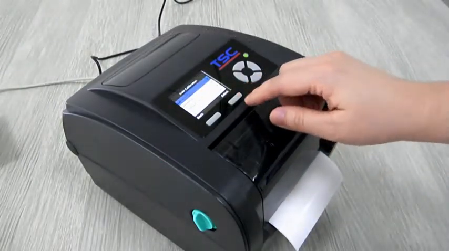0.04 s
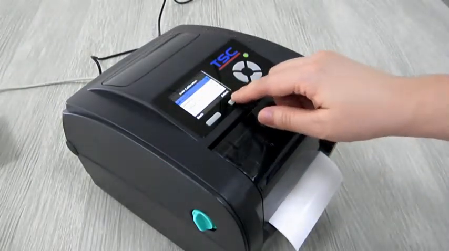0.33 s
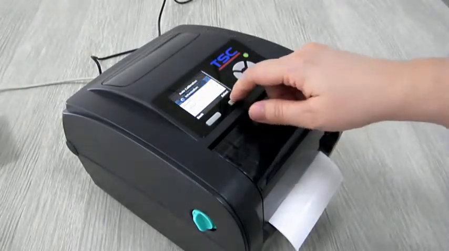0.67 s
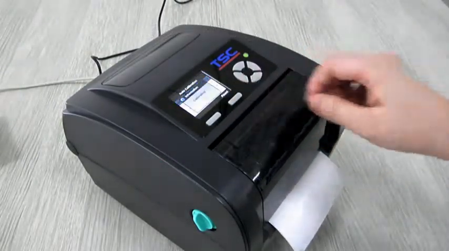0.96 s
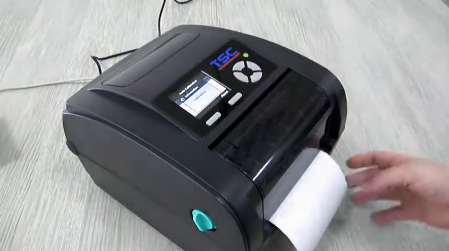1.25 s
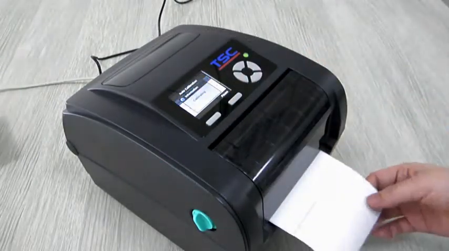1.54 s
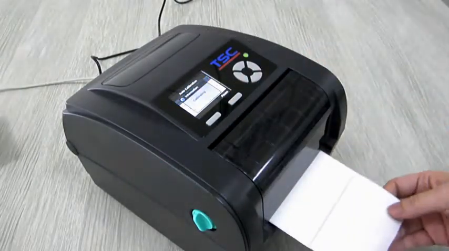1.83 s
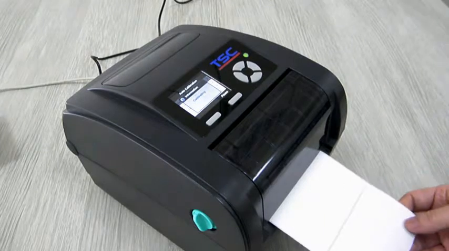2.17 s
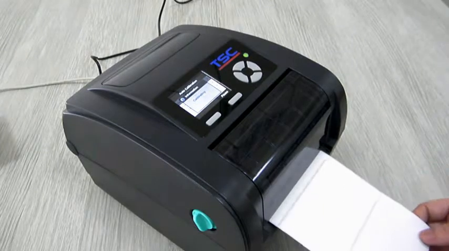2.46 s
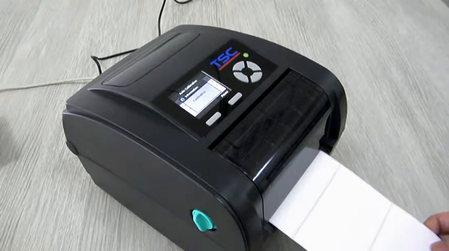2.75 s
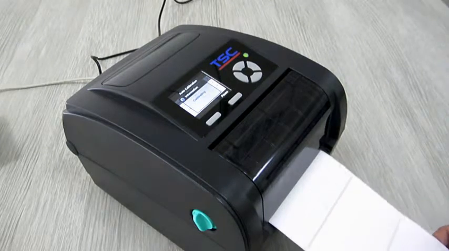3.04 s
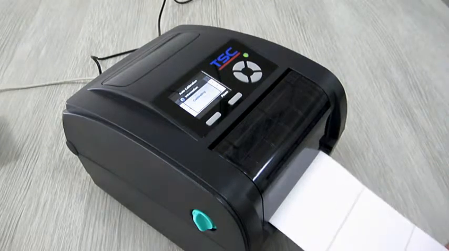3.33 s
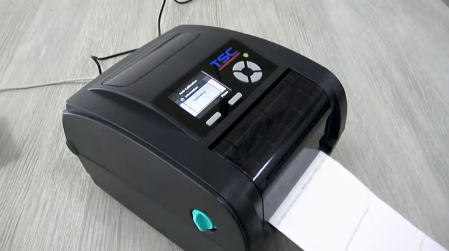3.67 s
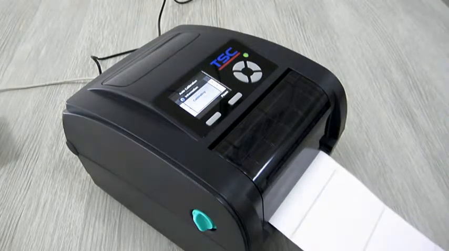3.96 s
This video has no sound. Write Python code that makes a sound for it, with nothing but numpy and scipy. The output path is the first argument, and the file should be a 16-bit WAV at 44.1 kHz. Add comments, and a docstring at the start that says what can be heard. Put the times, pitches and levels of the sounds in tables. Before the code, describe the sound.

A small label printer runs close by in a small room. After faint room noise, a button clicks down at about 0.6 seconds and up near 0.8. The drive starts at once with a clack, then hums at an even pitch over whirring gears and soft paper hiss until the end at 4 seconds. Label edges knock the plastic case around 1, 2.2 and 3.4 seconds.

```python
"""A desktop label printer

A button clicks down and up, the drive starts with a clack, and a stepper motor hums at its step rate
over whirring gears. Friction makes the strip hiss as it leaves the slot, and each label edge knocks
the plastic case into free vibration as it passes the roller. It is heard close by, in a small room."""
import sys
import numpy as np
from scipy import signal
from scipy.fft import rfft, irfft
from scipy.io import wavfile

SR = 44100
rng = np.random.default_rng(int(sys.argv[2]) if len(sys.argv) > 2 else 0)


def store_pcm(level_fs):
    """Save levels as 16-bit WAV."""
    pcm = np.round(np.clip(level_fs, -1, 1) * 32767).astype(np.int16)
    wavfile.write(sys.argv[1], SR, np.atleast_2d(pcm).T)


N = 176400
TIME = np.arange(N) / SR

# Stereo width. Each row: frequency in Hz, side relative to mid in dB.
STEREO_WIDTH = [(40, -21), (130, -25), (350, -34), (1000, -23), (3000, -16.5), (9000, -14.5)]
# Spectrum of the room noise. Each row: frequency in Hz, relative density in dB.
NOISE_SPECTRUM = [(20, -16.5), (40, -22), (55, -21.5), (100, -18.5), (160, -6.5), (250, -7), (320, -14.5),
                  (450, -17.5), (740, -20.5), (1300, -25), (2300, -26), (4000, -35.5), (7000, -41),
                  (8800, -45.5), (9800, -36), (10400, -35)]
# Decay of the room. Each row: frequency in Hz, reverberation time (t60) in seconds.
ROOM_DECAY = [(200, 0.89), (1000, 0.56), (3000, 0.29), (10000, 0.44)]

# One roller judder per label. Each row: centre in seconds, length in seconds, pitch in Hz, level in dB.
ROLLER_JUDDERS = [(0.893, 0.1, 122, -36.5), (1.98, 0.16, 141, -32.5), (3.177, 0.23, 141, -37)]
# Friction of the moving strip. Each row: time in seconds, scrape level in dB, hiss level in dB.
STRIP_LEVELS = [(.82, -24, -30), (.92, -29.5, -29), (1.0, -31, -29.5), (1.09, -26.5, -30.5),
                (1.2, -32, -31.5), (1.32, -29.5, -31), (1.48, -32, -29), (1.65, -34, -36.5),
                (1.87, -42.5, -39.5), (1.92, -33, -33.5), (1.98, -40, -38), (2.17, -37.5, -36),
                (2.25, -33.5, -37.5), (2.38, -41, -37.5), (2.75, -40, -39.5), (2.95, -37, -35),
                (3.12, -34.5, -35), (3.36, -37.5, -32.5), (3.6, -38.5, -38), (4.0, -41.5, -37.5)]
# Spectra of paper on the slot's lip and of the gears. Each row: frequency in Hz, relative density in dB.
SCRAPE_SPECTRUM = [(200, -19.5), (900, -9), (1400, 2.5), (2050, -9.5), (2400, 2.5), (2800, 1.5), (3300, 0),
                   (3900, -7), (6000, -30), (10400, -37)]
GEAR_SPECTRUM = [(40, -41), (100, -34), (140, -8.5), (200, -19), (245, -4.5), (300, 2.5), (370, -2),
                 (480, -8.5), (560, -5.5), (800, -5.5), (1100, -7.5), (1450, -8.5), (1650, -13), (1850, -8),
                 (2050, -11), (2300, -17), (3000, -21.5), (6000, -25), (10500, -68)]
# Bright paper hiss, with a deep notch filtered out near 8 kHz that is not the paper's own.
# Each row: frequency in Hz, relative density in dB.
NOTCHED_HISS = [(300, -14.5), (1500, -0.5), (3800, -4), (4700, 4), (5500, -1.5), (6300, -0.5), (7200, -4.5),
                (7900, -51.5), (8700, -3.5), (10400, -1.5)]

# Button down, button up, drive engaging. Each row: start in seconds, thud gain in dB,
# case gain in dB, snap gain in dB, snap time constant in seconds, rattle gain in dB.
CLICK_IMPACTS = [(.5668, -36, -29, -15.5, 0.0014, -38), (.7695, -25, -17.5, -12, 0.00066, -42),
                 (.8208, -6, -4.5, -6, 0.0012, -14)]
# Label edges meeting and leaving the roller. Each row: as for the clicks.
EDGE_IMPACTS = [(.9738, -16, -6.5, -15, 0.0024, -25.5), (.9790, -3, -27, -22, .001, -40),
                (.9950, -44, -37, -17.5, 0.0016, -32), (1.0163, -10, 0, -16, 0.0017, -21),
                (2.1650, -5.5, -37.5, -29, 0.0022, -41), (2.2045, -2, -22, -17, 0.0045, -20),
                (2.2105, -6, -29, -25, 0.0044, -20.5), (2.2240, -22, -21, -28, 0.0027, -21.5),
                (3.3530, -10, -41, -28, 0.0016, -23), (3.3930, -12, -13, -21, .005, -21),
                (3.3962, -2, -16.5, -18, 0.0046, -25)]
# Low modes (the thud) and high modes of the plastic case.
# Each row: frequency in Hz, relative level in dB, t60 in seconds.
THUD_MODES = [(210, -23, 0.083), (315, -5.5, 0.025), (326, -12.5, 0.077), (368, -2.5, 0.06),
              (454, -6.5, 0.026), (830, -16, 0.015), (1090, -9, 0.012)]
CASE_MODES = [(1120, -11, 0.012), (1450, -4.5, .014), (2650, -3.5, 0.021), (2810, -2.5, 0.018),
              (3100, -2, 0.009), (3530, -9.5, 0.018)]
# Sharp button and label-edge snaps, with a notch filtered out near 8 kHz that is not their own.
# Each row: frequency in Hz, relative density in dB.
NOTCHED_CLICK_SNAP = [(200, -18), (800, 3), (1400, 3), (2100, -4), (2900, 4), (4000, -2), (5000, 0.5),
                      (6500, -3.5), (7800, -19), (9000, -1.5), (10400, 0)]
NOTCHED_EDGE_SNAP = [(60, -29), (200, -16), (800, 5), (1400, 7.5), (2100, 1), (2900, 1), (4000, 3.5),
                     (6300, 3.5), (7800, -22), (8800, -9), (10400, -6.5)]
# Spectrum of loose parts rattling. Each row: frequency in Hz, relative density in dB.
RATTLE_SPECTRUM = [(60, -48.5), (140, -8), (220, -15.5), (350, 11), (550, 0), (1000, 1), (1500, -7),
                   (2100, -12), (3000, -26.5), (6000, -15), (10400, -55)]

# Motor speed. Each row: time in seconds, step rate in Hz.
STEP_RATE = [(.82, 446.8), (1.0, 447.3), (1.35, 448.4), (1.85, 447.8), (2.2, 446.6), (2.7, 446.5),
             (3.1, 447.1), (3.4, 445.6), (4.0, 446.2)]
# The step tone, its octave and the whine two octaves up. Each row: time in seconds, level in dB.
HUM_LEVEL = [(.82, -42), (.88, -20), (.96, -14), (1.01, -21), (1.13, -16.5), (1.25, -16.5), (1.38, -12.5),
             (1.6, -17), (1.77, -16.5), (2.1, -14), (2.3, -16.5), (2.57, -12.5), (2.88, -12.5),
             (2.98, -15.5), (3.32, -12.5), (3.41, -17), (3.55, -14), (4.0, -14)]
OCTAVE_LEVEL = [(.82, -37), (.96, -23.5), (1.03, -29.5), (1.15, -25.5), (1.32, -22.5), (1.63, -29),
                (1.85, -22), (1.93, -26), (2.06, -20.5), (2.2, -25), (2.29, -34.5), (2.47, -28),
                (2.61, -22), (2.88, -24), (2.98, -26.5), (3.3, -27), (3.52, -23.5), (4.0, -27)]
WHINE_LEVEL = [(.82, -39), (.94, -34.5), (1.1, -45), (1.93, -40.5), (2.03, -29.5), (2.2, -39), (2.3, -41),
               (2.44, -34.5), (2.86, -36.5), (2.96, -30), (3.1, -30.5), (3.35, -33), (3.44, -41),
               (3.55, -33.5), (4.0, -35)]
# Weaker motor and gear tones. Each row: frequency in Hz at the nominal step rate, level in dB.
DRIVE_TONES = [(397, -40.5), (489, -38.5), (588.5, -37.5), (669.5, -52.5), (751.5, -37.5), (992, -47.5),
               (1341, -46.5), (2132, -46), (2239, -45), (2750, -61)]


def amp(db):
    """Amplitude grows tenfold with every 20 dB."""
    return 10 ** (np.asarray(db) / 20)


def unit(x):
    """Normalisation to an rms of 1."""
    return x / np.sqrt(np.mean(x ** 2) + 1e-20)


def curve(points):
    """Linear interpolation of a time table at every sample."""
    return np.interp(TIME, *np.transpose(points))


def at_frequency(points, hz):
    """Interpolation of a table on a logarithmic frequency axis."""
    table_hz, value = np.transpose(points)
    return np.interp(np.log(hz + 1), np.log(table_hz + 1), value)


def add(mix, start_s, sound):
    """Superposition: a sound adds to the mix from its start time."""
    part = mix[round(start_s * SR):][:len(sound)]
    part += sound[:len(part)]


def drift(rate_hz):
    """Low-passed noise gives a slow random motion of rms 1."""
    hz = np.fft.rfftfreq(N, 1 / SR)
    return unit(irfft(rfft(rng.standard_normal(N)) / (1 + (hz / rate_hz) ** 4), N))


def colour(x, spectrum, size=4096):
    """A causal filter of unit energy imposes the shape of a spectrum."""
    hz = abs(np.fft.fftfreq(size, 1 / SR))
    log_gain = np.log(amp(at_frequency(spectrum, hz)))
    taps = np.fft.ifft(np.exp(signal.hilbert(log_gain).conj())).real[:size // 2]
    return signal.oaconvolve(x, taps / np.linalg.norm(taps))[:len(x)]


def spread(mid, other):
    """Mid-side stereo: a weak uncorrelated side signal gives a nearly mono pair."""
    width = amp(at_frequency(STEREO_WIDTH, np.fft.rfftfreq(N, 1 / SR)))
    side = irfft(rfft(other) * width, N)
    return np.array([mid + side, mid - side])


def stereo_noise(excite, spectrum):
    """Source and filter: two independent draws of an excitation, coloured alike, form mid and side."""
    return spread(*[unit(colour(excite(), spectrum)) for _ in range(2)])


def grains(per_s, spread_db, smooth):
    """Shot noise: tiny random impacts of uneven size, blended with smooth noise."""
    sizes = amp(spread_db * np.minimum(rng.exponential(1, N), 4)) * rng.choice([-1, 1], N)
    impacts = sizes * (rng.random(N) < per_s / SR)
    return unit(unit(impacts) + smooth * rng.standard_normal(N))


def ambience(level_db=-37.5):
    """Stationary noise, strongest at low frequencies, is the background of the room."""
    return amp(level_db) * stereo_noise(lambda: rng.standard_normal(N), NOISE_SPECTRUM)


def reverberation(x, size=256, density=.08, gap_samples=150):
    """Sparse reflections form a diffuse tail, each band decaying exponentially at its own rate."""
    echoes = []
    for _ in range(2):
        reflections = rng.choice([-1., 1.], SR) * (rng.random(SR) < density)
        reflections *= np.arange(SR) > gap_samples
        hz, t, bands = signal.stft(reflections, SR, nperseg=size)
        decay = amp(-60 * t / at_frequency(ROOM_DECAY, hz)[:, None])
        tail = signal.istft(bands * decay, SR, nperseg=size)[1]
        echoes.append(signal.fftconvolve(x, tail / np.linalg.norm(tail))[:N])
    return spread(*echoes)


def roller(wobble_cycles=0.025):
    """The roller judders ahead of each label edge: a low vibration under a Gaussian envelope."""
    sway = wobble_cycles * drift(15)
    out = 0
    for centre_s, length_s, hz, db in ROLLER_JUDDERS:
        envelope = amp(db) * np.exp(-(2 * (TIME - centre_s) / length_s) ** 2)
        out += envelope * np.sin(2 * np.pi * (hz * TIME + sway))
    return np.sqrt(2) * out


def paper(flicker_db=0.45):
    """Sliding friction: the strip scrapes the lip of the slot and hisses; a filter notches the hiss."""
    times, scrape_db, hiss_db = np.transpose(STRIP_LEVELS)
    out = 0
    for level_db, spectrum in ((scrape_db, SCRAPE_SPECTRUM), (hiss_db, NOTCHED_HISS)):
        friction = stereo_noise(lambda: grains(per_s=3000, spread_db=2.0, smooth=0.73), spectrum)
        out += amp(np.interp(TIME, times, level_db)) * friction
    return out * amp(flicker_db * drift(50))


def gears(steps, level_db=-26.5, pulsing=0.42, swell_db=1.0):
    """Amplitude modulation: teeth chatter into the housing, pushed by every motor step."""
    push = (1 + pulsing * np.cos(2 * np.pi * steps)) * amp(swell_db * drift(19))
    whir = stereo_noise(lambda: push * grains(per_s=1800, spread_db=1.9, smooth=0.69), GEAR_SPECTRUM)
    return amp(level_db) * whir


def ring(modes, t, detune=0.0098):
    """Free vibration is a sum of damped modes, here slightly detuned for every impact."""
    out = 0
    for hz, db, t60 in modes:
        detuned_hz = hz * (1 + detune * rng.uniform(-1, 1))
        out += amp(db - 60 * t / t60) * np.sin(2 * np.pi * detuned_hz * t)
    return out / 2


def crackle(t, decay_s, rise_s=0.00036, tail_db=-12.5, tail_s=0.0023):
    """A brief contact is broadband: the noise of a snap, dying as the sum of two exponentials."""
    decay = np.exp(-t / decay_s) + amp(tail_db) * np.exp(-t / tail_s)
    return rng.standard_normal(len(t)) * np.minimum(t / rise_s, 1) * decay


def rattle(t, rise_s=0.0042, decay_s=.055):
    """Loose parts, once shaken, collide at random with decaying strength."""
    collisions = grains(per_s=700, spread_db=0.87, smooth=0.26)[:len(t)]
    return unit(colour(collisions, RATTLE_SPECTRUM)) * np.minimum(t / rise_s, 1) * np.exp(-t / decay_s)


def impacts(table, snap_filter, room_db, tick_db=15.5, cutoff_hz=223):
    """Impulsive excitation: each blow snaps, rings the case and shakes loose parts; the room echoes."""
    direct, to_room = np.zeros(N), np.zeros(N)
    t = np.arange(SR // 3) / SR
    tick = amp(tick_db) * (t == 0)
    small_box = signal.butter(4, cutoff_hz, "high", fs=SR, output="sos")  # radiates little bass
    for start_s, thud_db, case_db, snap_db, snap_s, rattle_db in table:
        snap = amp(snap_db) * colour(tick + crackle(t, snap_s), snap_filter)
        modes = amp(thud_db) * ring(THUD_MODES, t) + amp(case_db) * ring(CASE_MODES, t)
        body = signal.sosfilt(small_box, modes)
        add(direct, start_s, body + snap + amp(rattle_db) * rattle(t))
        add(to_room, start_s, body + amp(snap_db) * colour(2 * tick, snap_filter))
    return direct + amp(room_db) * reverberation(to_room)


def stepper(steps, nominal_hz=447, flutter_db=0.92, jitter_cycles=0.011,
            gear_waver_db=3.0, gear_jitter_cycles=0.027):
    """Forced vibration: the step tone, its overtones and the gear tones all follow the motor speed."""
    uneven_steps = steps + jitter_cycles * drift(39)
    out = 0
    for harmonic, levels in ((1, HUM_LEVEL), (2, OCTAVE_LEVEL), (4, WHINE_LEVEL)):
        gain = amp(curve(levels) + flutter_db * np.sqrt(harmonic) * drift(20))
        out += gain * np.cos(2 * np.pi * harmonic * uneven_steps)
    for hz, db in DRIVE_TONES:
        gain = amp(db + gear_waver_db * drift(4.6))
        cycles = steps * hz / nominal_hz + gear_jitter_cycles * drift(15.4) + rng.random()
        out += gain * np.sin(2 * np.pi * cycles)
    return np.sqrt(2) * out


def scene(drive_start_s=.821, drive_rise_s=0.0025):
    """Sound pressures add: the running drive, the clicks, the knocks and the room noise."""
    steps = np.cumsum(curve(STEP_RATE)) / SR
    running = np.clip((TIME - drive_start_s) / drive_rise_s, 0, 1)
    drive = running * (stepper(steps) + gears(steps) + paper() + roller())
    clicks = impacts(CLICK_IMPACTS, NOTCHED_CLICK_SNAP, room_db=-7.5)
    knocks = impacts(EDGE_IMPACTS, NOTCHED_EDGE_SNAP, room_db=-7)
    return drive + clicks + knocks + ambience()


def record(dry, ceiling=.85, knee=12, cutoff_hz=10490):
    """Soft saturation rounds the loudest peaks, and a low-pass filter limits the bandwidth."""
    rounded = dry / (1 + abs(dry / ceiling) ** knee) ** (1 / knee)
    low_pass = signal.firwin(511, cutoff_hz, window=("kaiser", 9), fs=SR)
    return signal.oaconvolve(rounded, low_pass[None], "same")


dry = scene()
out = record(dry)
store_pcm(out)
```